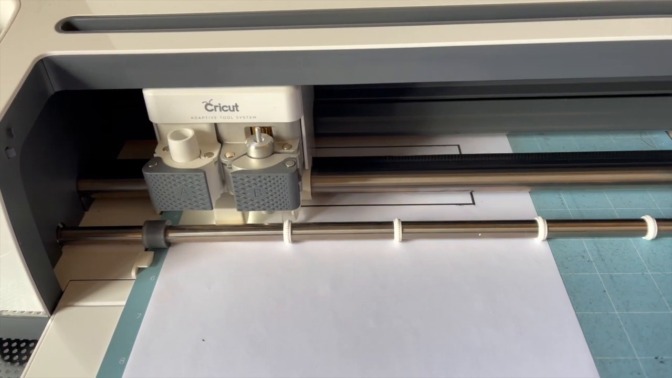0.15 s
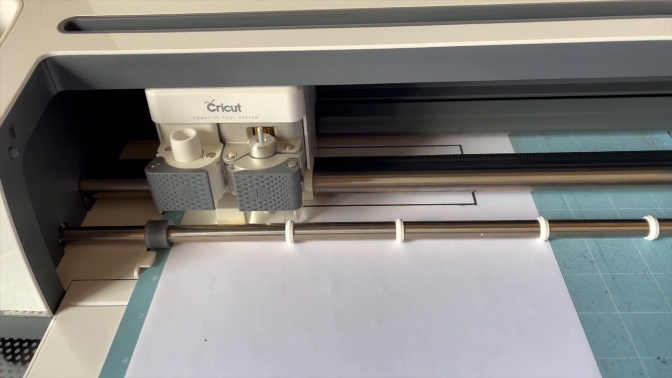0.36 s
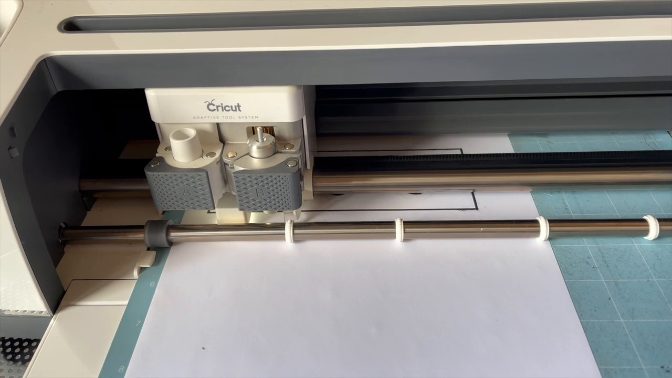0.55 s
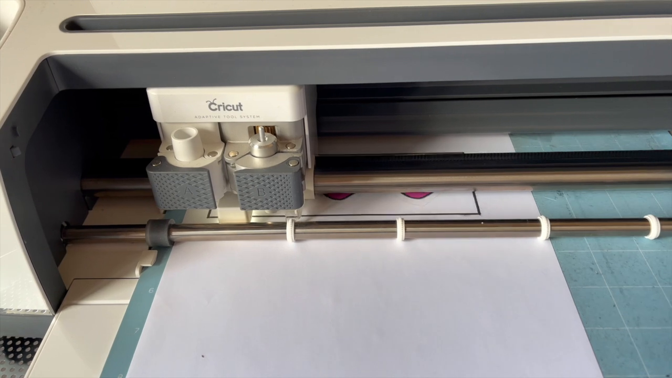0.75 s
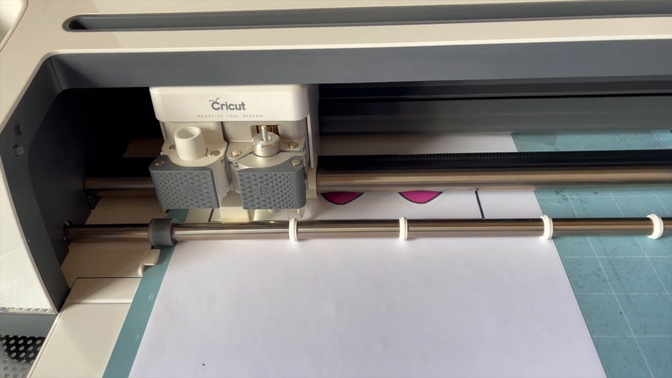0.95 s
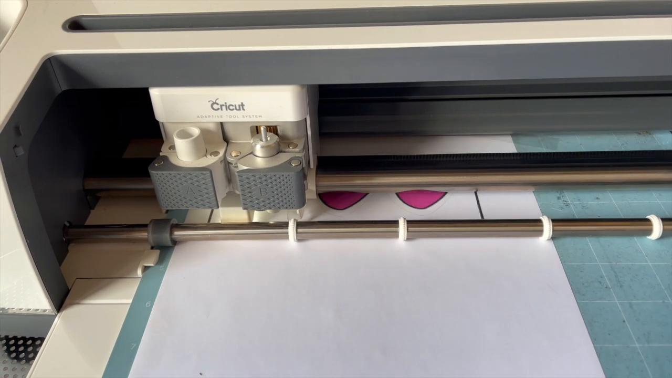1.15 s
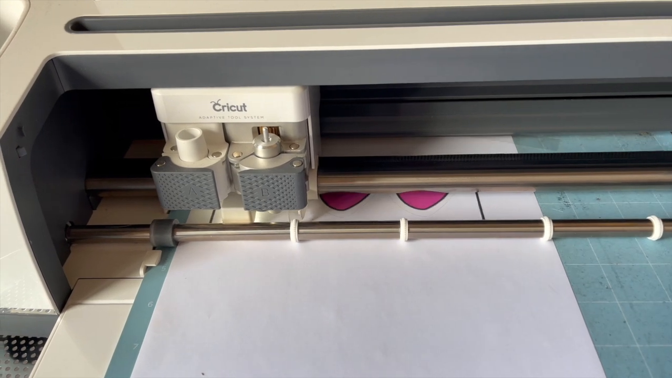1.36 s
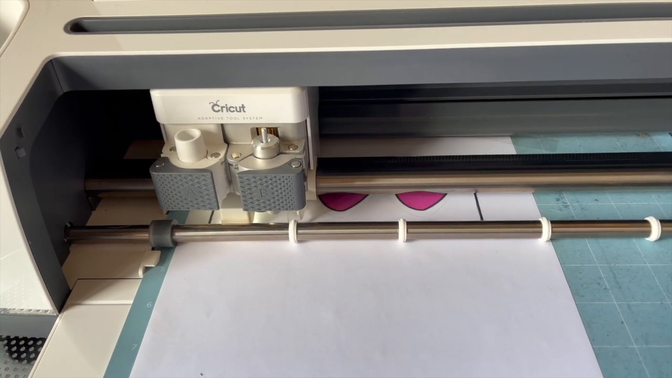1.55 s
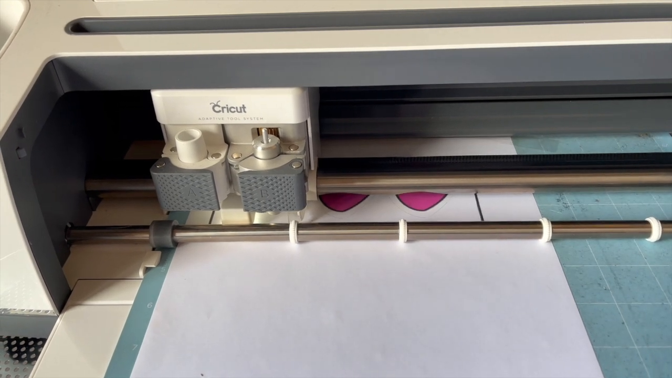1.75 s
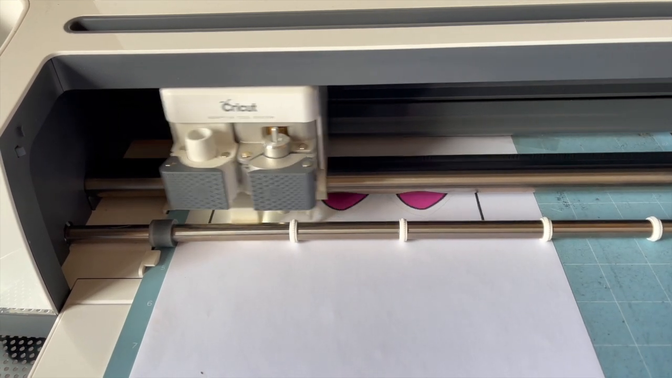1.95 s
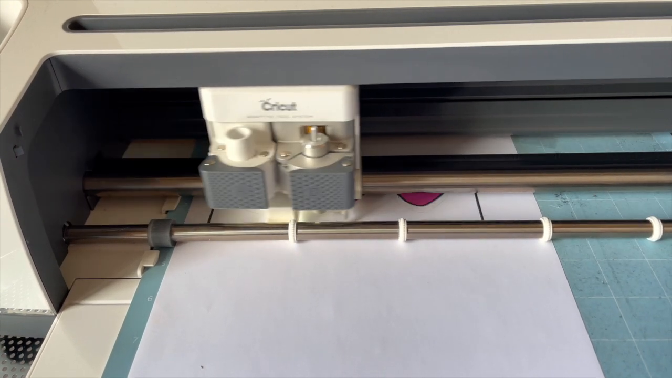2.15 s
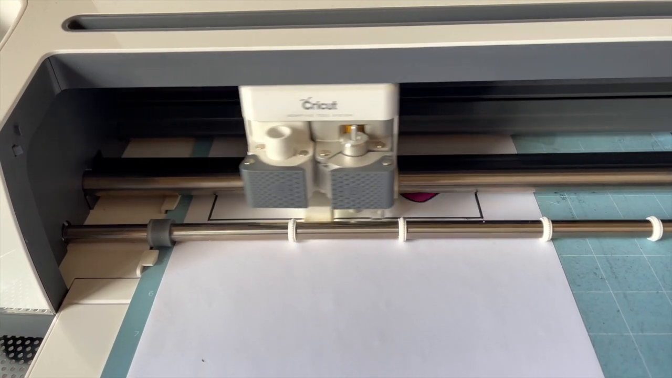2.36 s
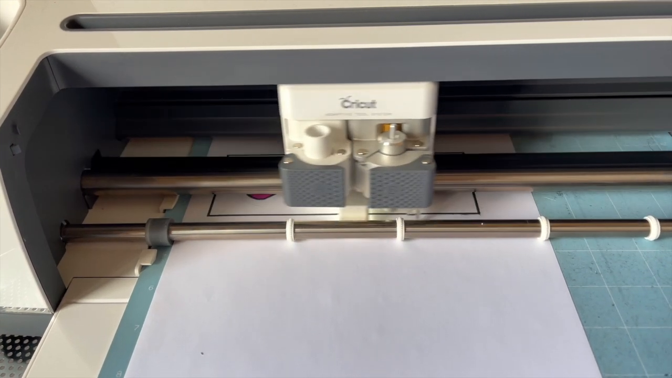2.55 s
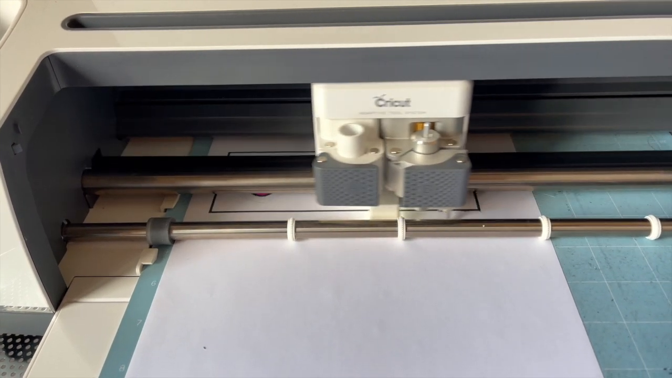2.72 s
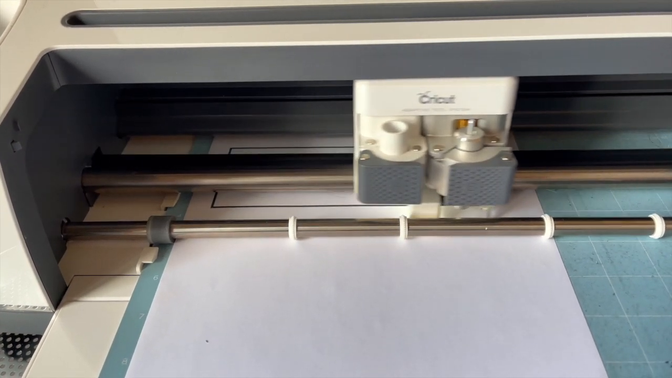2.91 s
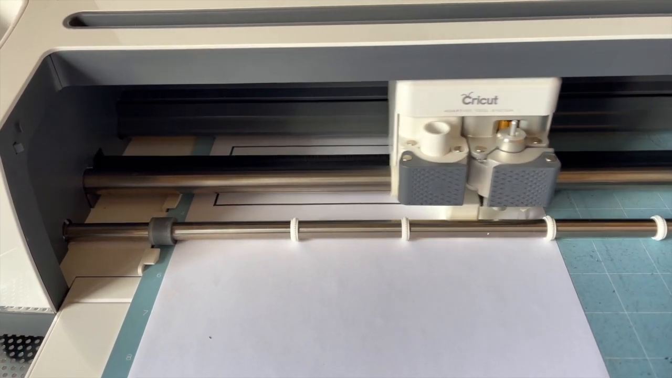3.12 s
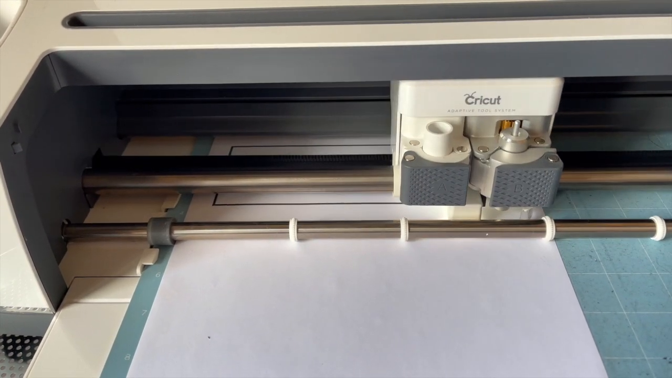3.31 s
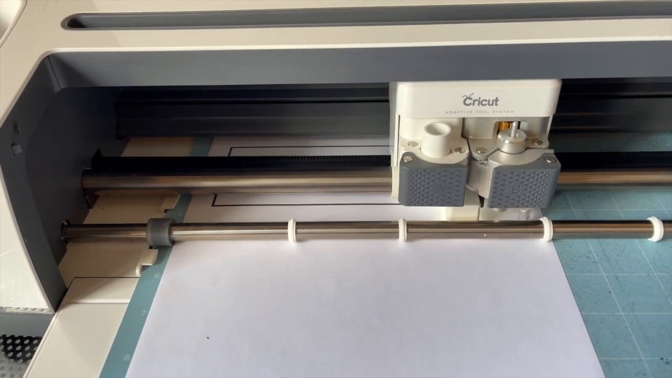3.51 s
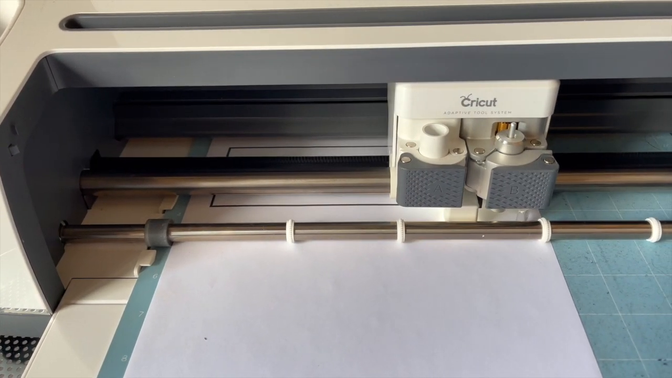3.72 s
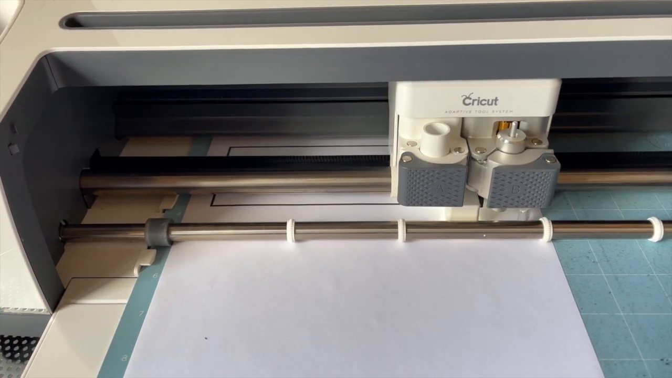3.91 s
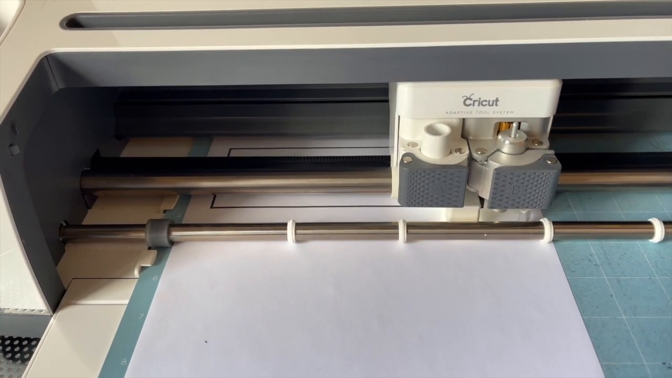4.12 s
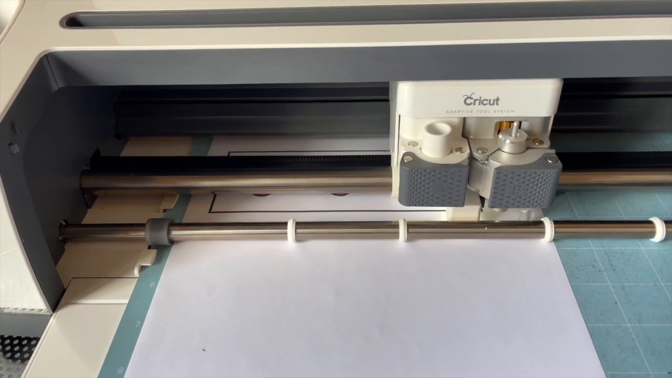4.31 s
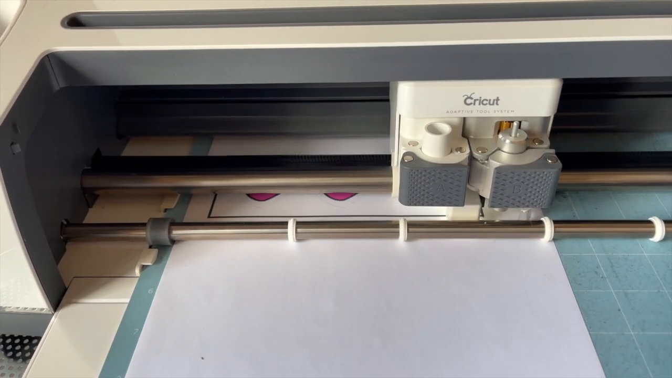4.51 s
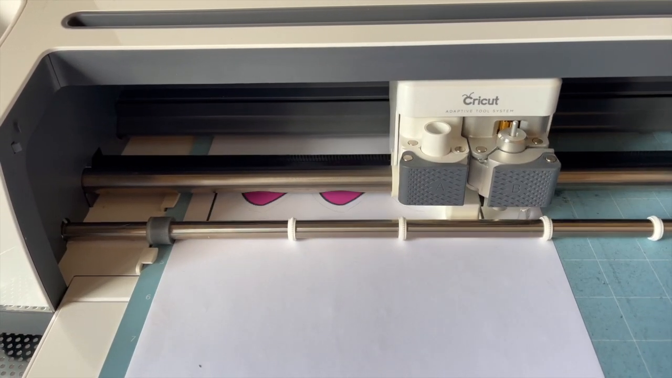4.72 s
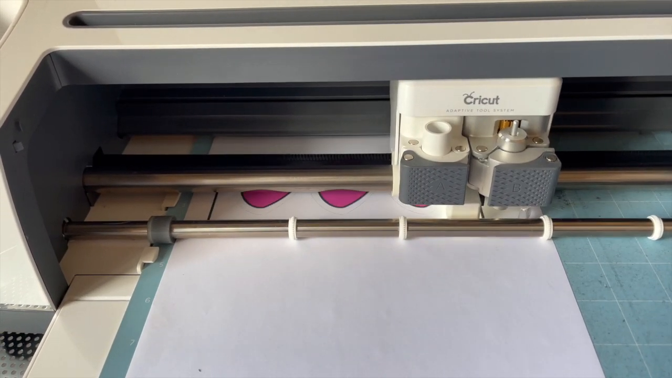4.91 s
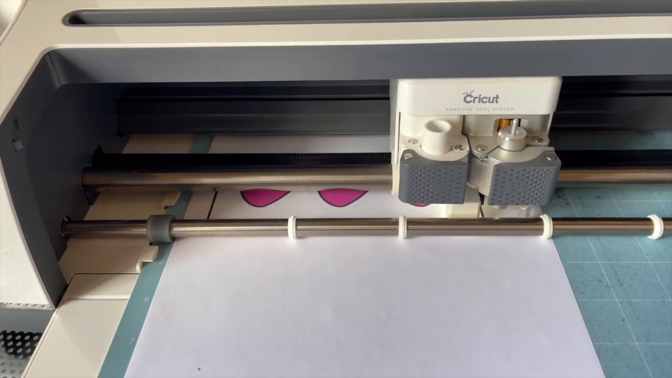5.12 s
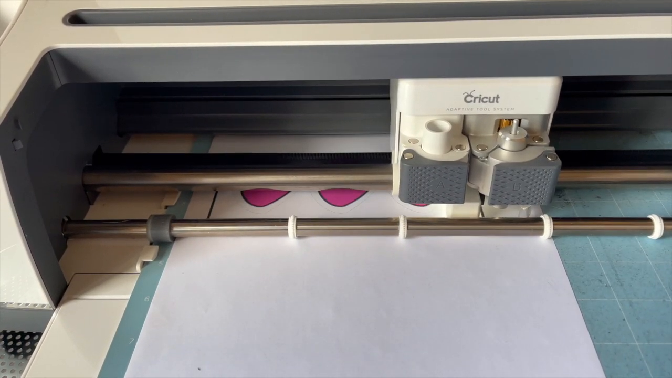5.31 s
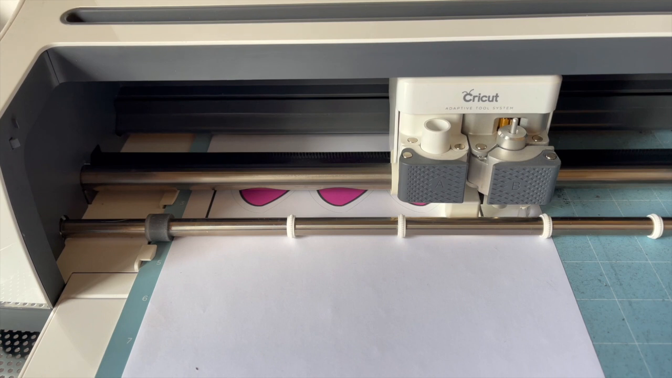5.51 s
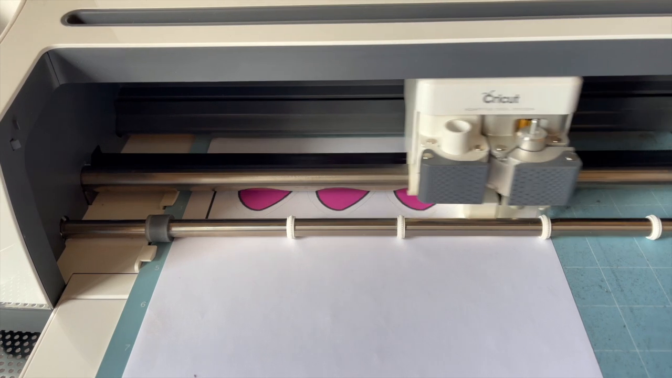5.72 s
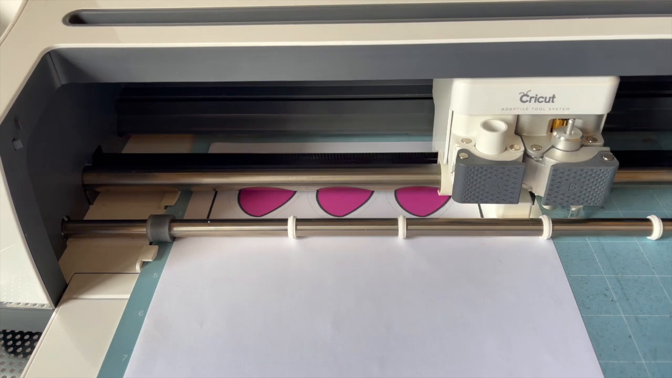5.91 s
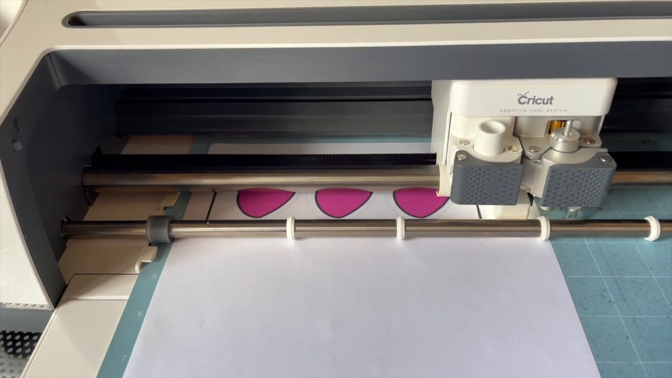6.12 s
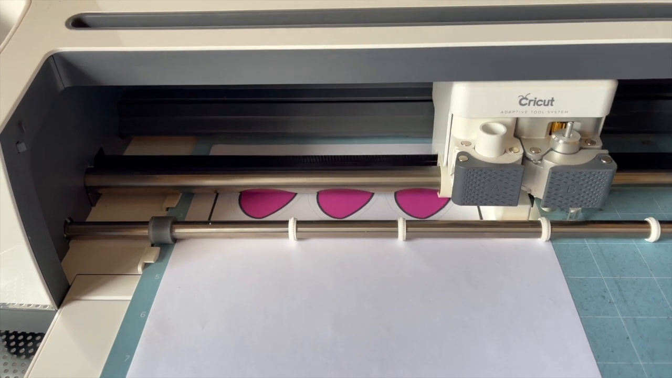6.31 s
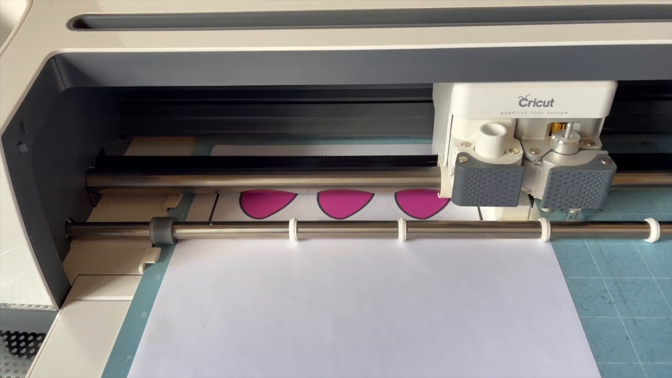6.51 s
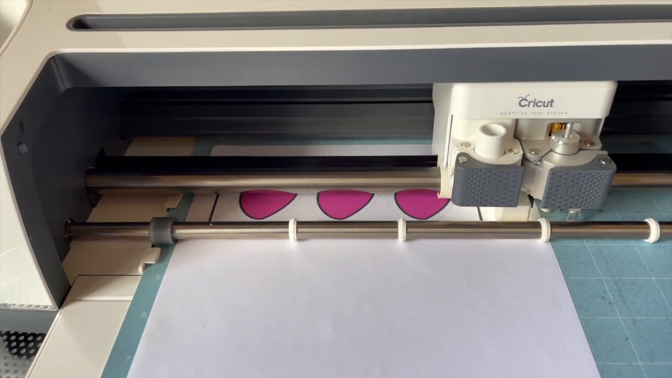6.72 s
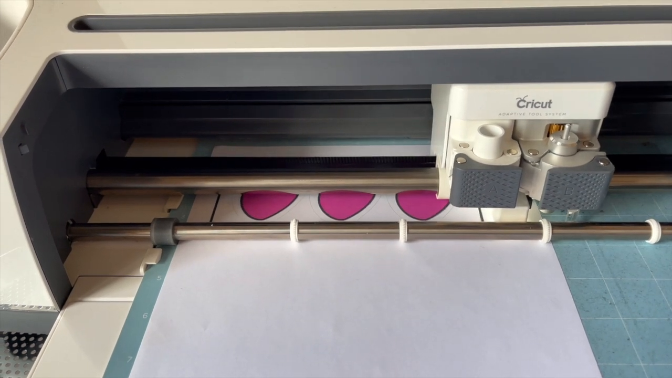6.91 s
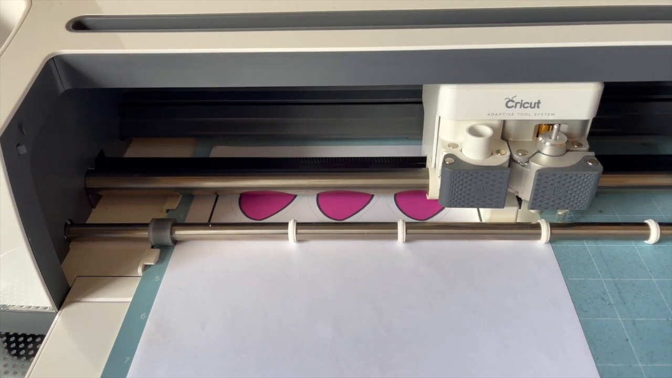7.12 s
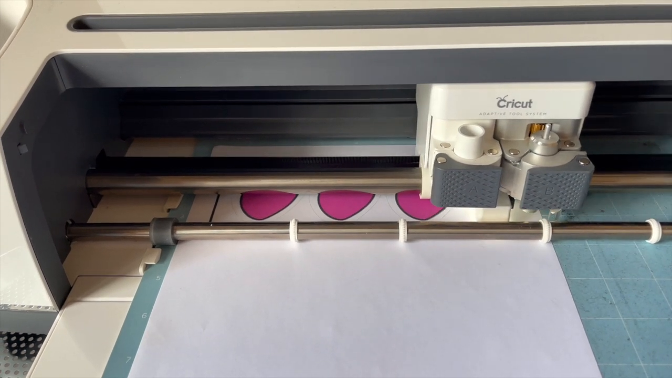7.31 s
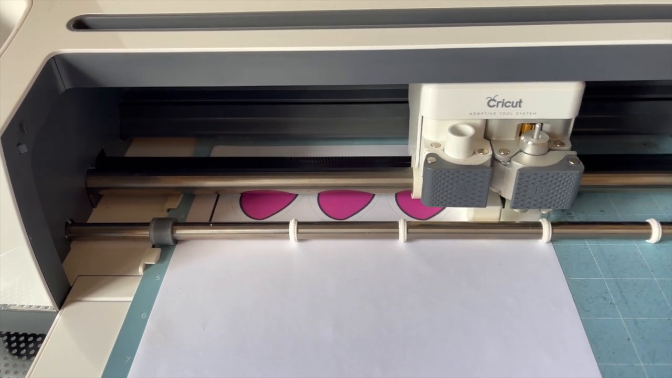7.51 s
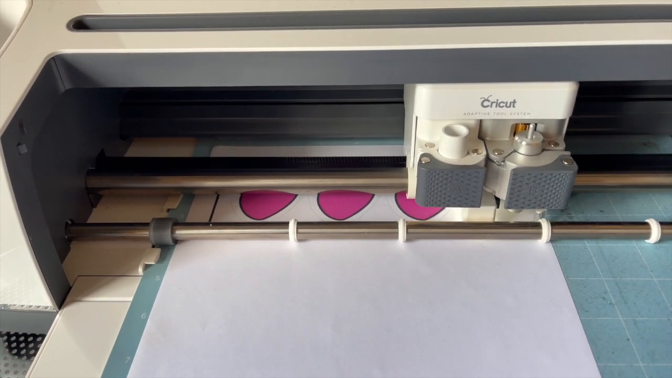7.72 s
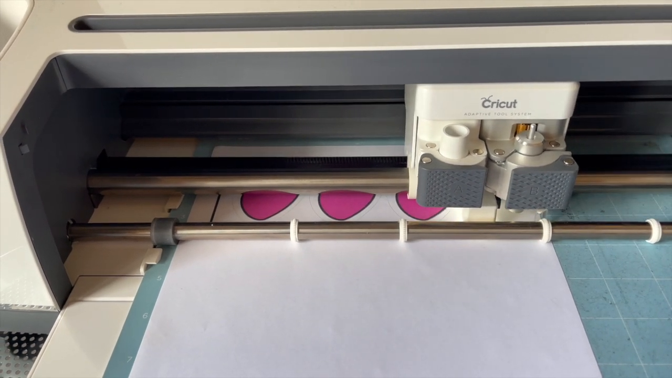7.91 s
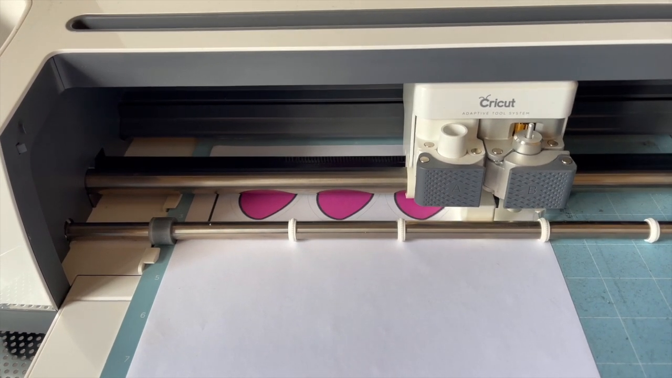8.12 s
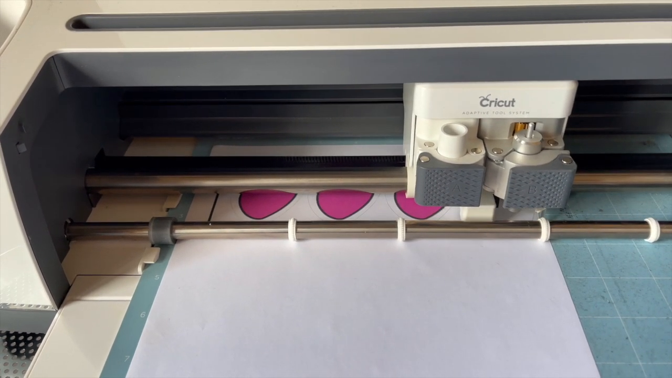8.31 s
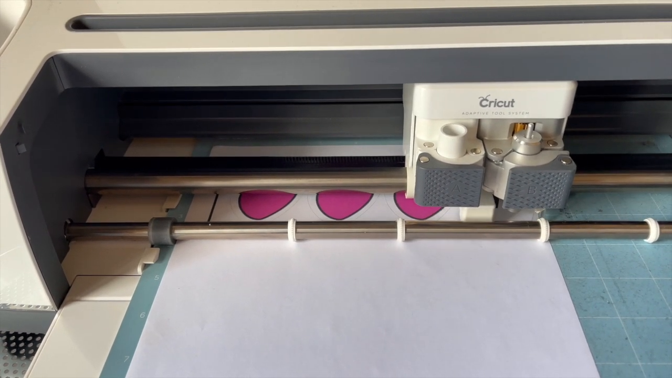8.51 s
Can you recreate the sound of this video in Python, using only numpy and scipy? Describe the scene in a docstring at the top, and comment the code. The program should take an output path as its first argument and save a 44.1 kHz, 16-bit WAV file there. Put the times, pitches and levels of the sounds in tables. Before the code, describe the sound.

Small geared motors buzz through a thin plastic housing, recorded very close in stereo. Rough, toothy feed grinding alternates with faster, fizzier carriage whirring, with dull double clacks as slack gears take up. Long pauses separate the early moves; later ones are shorter and closer together, ending in a single knock. Quiet indoor air, soft hiss and low rumble lie underneath.

```python
"""Desktop craft cutter at work

Carriage and mat run in short moves close to a two-port microphone.
Geared motors grind and buzz through a plastic housing: shaft-locked noise, tooth-gated scraping, gear tones.
Gear slack knocks as noise bursts ringing the case; the motor drive whines near 15.6 kHz.
The desk hums along and a small quiet room rings briefly, over room tone, hiss and a low rumble."""
import sys
import numpy as np
from scipy import signal
from scipy.fft import rfft, irfft, next_fast_len
from scipy.io import wavfile
from scipy.ndimage import uniform_filter1d

SR = 44100
rng = np.random.default_rng(int(sys.argv[2]) if len(sys.argv) > 2 else 0)


def generate_wav(signal):
    """Clip the signal to [-1, 1] and save it as 16-bit WAV at the path in sys.argv[1]."""
    frames = np.transpose(np.atleast_2d(signal))
    scaled = np.clip(frames, -1, 1) * 32767
    pcm = np.round(scaled).astype(np.int16)
    wavfile.write(sys.argv[1], SR, pcm)


N = 377055


def amp(db):
    """Amplitude factor of a level in dB."""
    return 10 ** (np.asarray(db) / 20)


def noise(length):
    """White Gaussian noise."""
    return rng.standard_normal(length)


def evened(x):
    """Scales to rms 1."""
    return x / np.sqrt(np.mean(x ** 2) + 1e-20)


def read(points, hz):
    """Interpolates a spectrum table along log frequency."""
    f, value = np.transpose(points)
    return np.interp(np.log(hz + 1), np.log(f + 1), value)


def add(mix, start_s, sound):
    """Adds a sound into the mix at its start, cut at the mix's end."""
    part = mix[..., round(start_s * SR):][..., :sound.shape[-1]]
    part += sound[..., :part.shape[-1]]


def colour(x, points, panels=()):
    """Filters by a dB spectrum with narrow resonances on top; rms 1."""
    size = next_fast_len(len(x) + 4096)
    hz = np.fft.rfftfreq(size, 1 / SR)
    db = read(points, hz)
    for f, width_hz, lift_db in panels:
        db = db + lift_db / (1 + (2 * (hz - f) / width_hz) ** 2)
    return evened(irfft(rfft(x, size) * amp(db), size)[:len(x)])


def wander(length, hz):
    """Slow chance about zero, rms 1."""
    width = int(SR / hz)
    slow = uniform_filter1d(uniform_filter1d(noise(length), width), width)
    return evened(slow - slow.mean())


def ring(modes, t):
    """Sum of exponentially decaying sines, one a mode (Hz, dB, t60 s)."""
    f, db, t60 = np.transpose(modes)[:, :, None]
    return (amp(db - 60 * t / t60) * np.sin(2 * np.pi * f * t)).sum(0)


# Port phase step. Each row: frequency in Hz, left lead in radians.
PORTS = [(0, 0), (100, -.1), (250, -.3), (450, -.5), (900, -1), (1500, 0), (2200, .2), (3500, .6),
         (4300, 1.3), (5000, 3.1), (5500, 5.2), (5900, 6.28), (6700, 6.5), (8000, 8.2), (8800, 9.3),
         (9100, 3 * np.pi), (10100, 3 * np.pi), (11000, 10.7), (12300, 12.57), (13800, 12.57),
         (15000, 14.8)]
# Port level step. Each row: frequency in Hz, left minus right in dB.
TILT = [(60, -2.5), (350, 2.5), (1200, -3.5), (2000, 2), (2500, -0.5), (3100, -1), (3600, 2.5), (4600, -3),
        (5200, -1), (5700, 0.5), (7000, 1)]


def ports(x, other, likeness):
    """Two ports: a shared part with phase and level steps by pitch, and an unshared part of opposite sign."""
    hz = np.fft.rfftfreq(N + 1, 1 / SR)
    step = amp(read(TILT, hz) / 2) * np.exp(.5j * read(PORTS, hz))
    same = np.clip(read(likeness, hz), -1, 1)
    shared = np.sqrt((1 + same) / 2) * rfft(x, N + 1)
    apart = np.sqrt((1 - same) / 2) * rfft(other, N + 1) * np.array([[1], [-1]])
    return irfft((shared + apart) * np.array([step, 1 / step]), N + 1)[:, :N]


# Room air. Each row: frequency in Hz, left-right likeness from -1 to 1.
SAME = [(60, .95), (250, .3), (700, -.7), (1200, -.6), (1700, 0), (2100, .4), (3300, .1), (5000, .6),
        (6200, .95), (7500, .65), (8800, 1), (10200, 1), (11000, .72), (13000, 1)]
# Room tone and hiss spectrum. Each row: frequency in Hz, level in dB per Hz.
FLOOR = [(20, -19), (60, -11), (100, -8), (170, -10), (300, -13), (500, -17), (800, -21), (1300, -24),
         (2500, -29), (5200, -32), (8900, -33), (11500, -31), (12900, -42), (13900, -70)]
# Low rumble before its wobble. Each row: time in seconds, level in dB.
SWAY = [(0, -87.5), (0.7, -72), (1.2, -67), (1.6, -89), (2.1, -67), (4.4, -62.5), (5.201, -65.5),
        (7.6, -64), (8.55, -68)]


def air():
    """Room tone and microphone hiss, a low rumble that comes and goes, the last ring of an earlier move."""
    t = np.arange(N) / SR
    floor_db, wobble_db, fading_db, fall_db_per_s = -69.5, 4, -63, 190
    hiss = ports(colour(noise(N), FLOOR), colour(noise(N), FLOOR), SAME)
    low = colour(noise(N), [(20, -39.5), (35, -9), (55, -0.5), (95, -2), (160, -27), (300, -60)])
    low_db = np.interp(t, *np.transpose(SWAY)) + wobble_db * wander(N, 6)
    last = colour(noise(N), [(150, -20), (300, -0.5), (800, -10), (1600, -19.5), (3000, -50)])
    fading = amp(fading_db - fall_db_per_s * t) * last
    return fading + amp(floor_db) * hiss + amp(low_db) * low


# Room decay. Each row: frequency in Hz, t60 in seconds.
ROOM = [(100, .55), (260, .38), (700, .28), (1800, .3), (2600, .26), (4000, .15), (6000, .1), (12000, .07)]
# Room tail colour: a dip near 3 kHz, brighter above. Each row: frequency in Hz, tail level in dB.
TAIL_COLOUR = [(2500, -5), (3100, -8), (8000, 3)]


def room(x):
    """Sparse taps of random sign, each band dying at its own speed."""
    taps, slots = np.zeros(SR // 2), np.arange(300, SR // 2 - 20, 20)
    taps[slots + rng.integers(0, 20, len(slots))] = rng.choice([-1., 1.], len(slots))
    hz, t, z = signal.stft(taps, SR, nperseg=512)
    decay_db = read(TAIL_COLOUR, hz)[:, None] - 60 * t / read(ROOM, hz)[:, None]
    tail = signal.istft(z * amp(decay_db), SR, nperseg=512)[1]
    return signal.fftconvolve(x, tail / np.linalg.norm(tail))[:N]


def scattered(x):
    """The same sound after bouncing among nearby parts for some milliseconds."""
    burst = rfft(noise(4096) * np.exp(-np.arange(4096) / 500))
    power = uniform_filter1d(abs(burst) ** 2, 30)
    return signal.oaconvolve(x, irfft(burst / np.sqrt(power)))[:N]


# Desk modes. Each row: frequency in Hz, relative level in dB, t60 in seconds.
DESK = [(126, -16, .4), (158, -14, .4), (235, -19, .4), (300, -16, .45), (345, -17, .4), (410, -19, .4)]


def desk(machine):
    """The machine's sound excites desk modes that hum on after each stop."""
    response = amp(-48.5) * ring(DESK, np.arange(SR // 2) / SR)
    return signal.fftconvolve(machine, response)[:N]


# Case modes, softened and shortened in use. Each row: frequency in Hz, raw level in dB, raw t60 in seconds.
CASE = [(468, -21.5, 0.027), (800.6, -35, 0.061), (1079.5, -15.5, 0.08), (1246, 4, 0.01),
        (1360, -3, 0.0092), (1815, 5.5, 0.043), (2233, 3, 0.064), (3050, -40, 0.39), (2950, -32, 0.21),
        (3420, -40.5, 0.053), (3600, -31, 0.031), (4110, -44, 0.059), (4370, -32.5, 0.065),
        (4700, -41.5, 0.063)]
# Case rumble spectrum. Each row: frequency in Hz, level in dB per Hz.
RUMBLE = [(130, -39.5), (215, -5.5), (290, 0), (360, -1), (394, -3.5), (426, -2), (565, -7.5), (600, -12),
          (780, -34), (1320, -120)]
# Carriage motor fizz spectrum, also the knock's tick. Each row: frequency in Hz, level in dB per Hz.
FIZZ = [(2000, -48), (2800, -3.5), (3100, -13.5), (3500, 1), (4100, -17.5), (5100, -2.5), (5700, -11.5),
        (6500, -15.5), (7600, -14), (8400, -12.5), (10300, -8), (11500, -8), (12800, -19.5), (13300, -28),
        (13800, -70.5)]


def knock(s, db, hz, upper_db, tick_db, thump_db):
    """A short swelling rattle rings the case, most near its brightest pitch; the desk thumps."""
    t = np.arange(SR // 5) / SR
    rattle = noise(len(t)) * (t / .004) ** 3 * np.exp(-t / .0025)
    lower = [(f, .5 * g - 9 * np.log2(f / hz) ** 2, np.clip(.3 * d, .008, .03))
             for f, g, d in CASE if f < 1600]
    upper = [(f, .6 * g, np.clip(.4 * d, .008, .025)) for f, g, d in CASE if f >= 1600]
    parts = [signal.fftconvolve(rattle, ring(modes, t))[:len(t)] for modes in (lower, upper)]
    parts.append(colour(rattle, FIZZ))
    click = sum(amp(g) * p / abs(p).max() for g, p in zip((db, upper_db, tick_db), parts))
    click = signal.lfilter(*signal.butter(3, 620, "high", fs=SR), click)  # the click keeps no bass
    bass = [(70, -24.5), (130, 0)] + RUMBLE[1:4] + [(500, -6.5), (900, -30.5), (1500, -80.5)]
    thump = amp(thump_db - 60 * t / 0.22) * np.minimum(t / .025, 1) * colour(noise(len(t)), bass)
    return s - .007, click + thump  # the rattle swells for about 7 ms


# Gear slack taking up. Each row: time of swell in seconds, lower ring peak in dB before the bass cut,
# brightest pitch in Hz, upper ring peak in dB, tick peak in dB, bass thump in dB.
KNOCKS = [(0.321, -19.5, 1146, -21.5, -54, -49.5), (0.358, -14.5, 1192, -22.5, -36, -49),
          (1.831, -23.5, 1145, -21.5, -59, -48), (1.863, -20.5, 970, -34.5, -42, -52),
          (3.219, -22.5, 1299, -29.5, -56, -45.5), (3.472, -45, 1097, -46, -55, -45.5),
          (3.519, -15.5, 1040, -20.5, -54.5, -54), (3.589, -17, 1068, -20.5, -43, -48.5),
          (4.021, -29, 1290, -38, -58, -51), (4.846, -30, 1260, -36, -50, -47.5),
          (5.543, -21.5, 1145, -24, -59.5, -54), (5.591, -15, 1110, -22.5, -36, -55),
          (5.988, -18.5, 1054, -21, -54, -41), (6.252, -40, 833, -46, -53.5, -47.5),
          (6.293, -23.5, 1460, -26.5, -41, -55), (6.374, -20, 1194, -33, -40, -53.5),
          (6.82, -33, 1374, -44, -43, -41), (6.836, -38, 1300, -41, -39.5, -61),
          (7.049, -20, 1140, -34, -70.5, -50), (7.39, -36, 1300, -31.5, -47, -60.5),
          (7.675, -25.5, 1280, -41.5, -49.5, -38.5), (8.263, -14, 1150, -22, -66, -31.5)]


def knocks(machine):
    """Gear slack knocks through the case, one a row."""
    for row in KNOCKS:
        add(machine, *knock(*row))


def gear_tones(tones, shaft_hz, turns, speed):
    """Gear tones turn with the shaft, waver a little and sound near cruising speed."""
    out = np.zeros(len(turns))
    cruising = np.clip(speed * 12 - 11, 0, 1) * np.sqrt(2)
    for hz, db in tones:
        order = hz / shaft_hz
        if abs(order - round(order)) < .25:
            order = round(order)  # most are whole shaft orders
        waver = amp(db - .5 + 1.5 * wander(len(turns), 8))
        out += cruising * waver * np.cos(2 * np.pi * (order * turns + rng.random()))
    return out


def drive_whine(t, turns):
    """Chopper whine, with a side tone below it from the commutator segments."""
    whine_hz, segments = 15625, 5
    carrier = whine_hz * t
    return 1.6 * np.cos(2 * np.pi * carrier) + .6 * np.cos(2 * np.pi * (carrier - segments * turns))


# Housing panels. Each row: frequency in Hz, width in Hz, lift in dB.
PANELS = [(327, 40, 3.5), (987, 27, 2.5), (1132, 56, 4.5), (1262, 21, 5.5), (1440, 36, 5), (1740, 46, 5.5),
          (2050, 110, 5.5), (2316, 50, 3), (2920, 51, 9.5), (3580, 37, 4.5), (5650, 72, 2.5)]
# Desk boom spectrum. Each row: frequency in Hz, level in dB per Hz.
BOOM = [(50, -47.5), (85, -17), (110, -9.5), (130, -1), (158, -1.5), (190, -11), (240, -28.5), (400, -67.5)]
# Roller feed fizz spectrum. Each row: frequency in Hz, level in dB per Hz.
FEED_FIZZ = [(2000, -51), (2800, -8), (3600, 0), (4200, -4), (5500, -4.5), (6200, -14), (7800, -5.5),
             (8400, -1.5), (9500, -9), (10300, -9), (12500, -15), (13200, -26), (13800, -74)]


def move(row, drive):
    """Worn gears repeat one rough pattern every shaft turn, under scraping that each tooth gates."""
    housing, hiss, tones, shaft_hz, repeat = drive
    start, up, down, late, stop, grind_db, fizz_db, boom_db, *ends_db = row
    rise_s, fall_s, shake_s, linger_s = .07, .1, .04, .02  # case and desk outlast the gears
    t = np.arange(start, stop + linger_s, 1 / SR)

    # levels: at crawl every move grinds alike
    crawl_grind_db, crawl_fizz_db, crawl_rumble_db, crawl_whine_db = -42, -51.5, -2, -9.5  # last two relative
    late_db, late_s = -41.5, .035  # the desk boom settles to a common late level
    full = np.interp(t, [up - rise_s, up, down, down + fall_s], [0, 1, 1, 0])
    running = np.clip((stop - t) / 0.013, 0, 1)
    shaking = np.clip((t - start) / shake_s, 0, 1)
    grind_level = running * amp(crawl_grind_db + (grind_db - crawl_grind_db) * full)
    fizz_level = running * amp(crawl_fizz_db + (fizz_db - crawl_fizz_db) * full)
    boom_level = shaking * amp(np.interp(t, [late, late + late_s], [boom_db, late_db]))
    rumble_db = np.interp(t, [start, stop], ends_db[:2]) + crawl_rumble_db * (1 - full)
    rumble_level = shaking * amp(rumble_db)
    whine_db = np.interp(t, [up, stop], ends_db[2:]) + crawl_whine_db * (1 - full)
    whine_level = running * amp(whine_db)

    # shaft: ramps up, cruises, slows
    speed = np.interp(t, [start, up, down, stop + .03], [.5, 1, 1, .4])
    turns = np.cumsum(shaft_hz * speed * (1 + .0008 * wander(len(t), 9))) / SR

    # gear contact
    teeth = 11
    wear = noise(int(SR / shaft_hz))
    pattern = wear[(turns % 1 * len(wear)).astype(int)]
    gate = 0.22 + np.exp(-(teeth * turns % 1) / 0.46)
    chatter = amp(1.2 * wander(len(t), 120) + .6 * wander(len(t), 25))  # uneven contact
    swell_db = 2.2 if hiss == FEED_FIZZ and tones else 1.2
    chatter = chatter * amp(swell_db * np.cos(2 * np.pi * turns))  # off-centre pinion, once a turn
    repeat = np.clip(repeat, 0, 1)
    scraping = evened(gate * chatter * noise(len(t)))
    scrape = np.sqrt(repeat) * pattern + np.sqrt(1 - repeat) * scraping

    out = grind_level * colour(scrape, housing, PANELS)
    out += rumble_level * colour(noise(len(t)), RUMBLE, PANELS)
    out += boom_level * colour(noise(len(t)), BOOM)
    belt = 1 + (hiss == FIZZ) * 1.5 * np.exp(-((turns / 3 - .14) % 1) / .06)  # pulley tick every third turn
    out += fizz_level * colour(belt * np.sqrt(gate) * chatter * noise(len(t)), hiss, PANELS)
    out += gear_tones(tones, shaft_hz, turns, speed)
    out += whine_level * drive_whine(t, turns)
    return start, out * np.clip((t - start) / 0.02, 0, 1) * np.clip((t[-1] - t) / 0.0091, 0, 1)


# Grind through the housing, by way of driving. Each row: frequency in Hz, level in dB per Hz.
FEED_IN = [(320, -38.5), (550, -15), (744, -17.5), (801, -11.5), (875, -13), (1010, 0.5), (1060, -7),
           (1140, -4.5), (1250, -9), (1350, -5), (1410, -19), (1620, -9), (1750, -23.5), (2330, -13.5),
           (3200, -39.5), (4160, -72.5), (7040, -120)]
FEED_OUT = [(320, -33), (550, -6), (592, -20), (744, -15), (825, -10.5), (868, -16), (1130, -4.5),
            (1380, -15.5), (1510, -16.5), (1600, -23), (1760, -15.5), (2100, -27.5), (2350, -19),
            (2720, -32), (3200, -57), (4160, -64), (7040, -120)]
TRAVERSE = [(320, -51.5), (550, -20), (614, -13), (801, -5.5), (868, -11.5), (1160, -3.5), (1260, -2.5),
            (1410, 0), (1530, -6.5), (1800, -5.5), (1900, -2.5), (2070, -4.5), (2530, -19), (2890, -29.5),
            (3200, -18.5), (4160, -60), (7040, -120)]
DIAGONAL = [(320, -62.5), (550, -12.5), (650, -29.5), (726, -15), (812, -16), (927, -12.5), (1100, -10),
            (1190, -7), (1290, -11.5), (1640, -18.5), (1810, -13), (2900, -35), (3770, -70.5), (6380, -120)]
HOP = [(320, -35), (550, -11.5), (813, -12.5), (856, -14), (1130, -6), (1390, -14.5), (1510, -7),
       (1640, -16), (1810, -4.5), (2130, -13), (2350, -7.5), (2680, -21), (3200, -28), (4160, -43),
       (7040, -120)]
CREEP = [(320, -41), (550, -31), (628, -4.5), (783, -4), (856, -6), (984, -12), (1260, -4.5), (1590, -15),
         (1760, -9.5), (1920, -20.5), (2330, -13.5), (2680, -21.5), (3200, -31), (4160, -42), (7040, -120)]
# Strongest tones at cruise, mostly gear tones snapped to shaft orders; the feed-out one at 1136 Hz is a narrow
# resonance. Each row: frequency in Hz, level in dB rms.
FEED_IN_TONES = [(328.4, -50), (495.3, -62), (656.8, -61), (823.6, -48), (990.5, -45), (1141, -49),
                 (1168, -51), (1319, -46), (1486, -57), (1588, -56)]
FEED_OUT_TONES = [(129.2, -49), (328.4, -40), (463.0, -52), (656.8, -56), (823.6, -52), (1001, -52),
                  (1136, -44), (1314, -52), (1480, -54), (1750, -55)]
TRAVERSE_TONES = [(285.3, -39), (393.0, -46), (522.2, -54), (576.0, -49), (678.3, -56), (807.5, -52),
                  (990.5, -49), (1044, -50), (1071, -51), (1098, -48), (1120, -47), (1147, -39),
                  (1174, -42), (1200, -41), (1357, -42), (1384, -42), (1410, -41), (1437, -39), (1486, -51),
                  (1620, -44), (1696, -46), (1750, -39), (1776, -40), (1906, -46), (2008, -43), (2062, -47),
                  (2218, -51), (2272, -55)]
DIAGONAL_TONES = [(285.3, -39), (473.7, -42), (710.6, -42), (952.8, -37), (1044, -43), (1190, -32),
                  (1437, -41), (1771, -42), (2008, -47), (2035, -44)]
# How each move is driven. Each row: grind colour, fizz colour, tones, shaft turns per second at cruise,
# share of the grind repeating every turn from 0 to 1.
DRIVES = [(FEED_IN, FEED_FIZZ, FEED_IN_TONES, 14.98, .3), (TRAVERSE, FIZZ, TRAVERSE_TONES, 26.09, .38),
          (CREEP, FIZZ, [], 8, .1), (FEED_OUT, FEED_FIZZ, FEED_OUT_TONES, 14.93, .3),
          (DIAGONAL, FIZZ, DIAGONAL_TONES, 21.6, .15), (CREEP, FEED_FIZZ, [], 8, .1), (CREEP, FEED_FIZZ, [],
          8, .1), (HOP, FEED_FIZZ, [], 21.4, .2)]
# Moves. Each row: start, cruise start, cruise end, time the desk boom turns to its late level and stop
# in seconds, then in dB: gear grind, brush fizz and desk boom, case rumble at start and at stop,
# drive whine at cruise start and at stop.
MOVES = [(0.315, 0.40, 1.15, 1.06, 1.195, -37, -56.5, -59, -55, -39, -76, -59),
         (1.824, 1.95, 3.07, 3.01, 3.272, -30.5, -40.5, -43, -42, -37, -56, -62),
         (3.468, 3.54, 3.60, 3.48, 3.65, -39, -51, -42, -37, -39, -76, -76),
         (4.012, 4.08, 4.84, 4.85, 4.893, -34.5, -55, -47, -40, -38, -65, -70),
         (5.533, 5.67, 5.82, 5.94, 6.025, -27, -40.5, -45, -37, -36, -60, -80),
         (6.249, 6.30, 6.39, 6.35, 6.425, -39, -51, -37, -40, -36, -82, -86),
         (6.812, 6.84, 7.65, 6.98, 7.685, -43, -59, -37, -39, -39, -70, -79),
         (7.035, 7.05, 7.24, 7.27, 7.275, -28, -45, -50, -42, -40, -88, -88)]


def moves(machine):
    """Carriage and feed motors run, one move a row."""
    for row, drive in zip(MOVES, DRIVES):
        add(machine, *move(row, drive))


# Machine at the ports. Each row: frequency in Hz, left-right likeness from -1 to 1.
NEAR = [(100, .99), (400, .96), (900, .88), (1900, .97), (2500, .4), (3300, .3), (4300, .5), (4800, .8),
        (6200, 1), (7300, .75), (8700, 1), (10200, 1), (10700, .85), (12000, .85), (13000, 1)]


def scene():
    """Machine, desk and room reach the two ports over the room air."""
    machine = np.zeros(N)
    moves(machine)
    knocks(machine)
    heard = machine + desk(machine) + amp(-12) * room(machine)
    heard = signal.lfilter(*signal.butter(2, 75, "high", fs=SR), heard)  # the deep bass falls away below 75 Hz
    return ports(heard, scattered(heard), NEAR) + air()


def record(dry):
    """The band limit: a steep linear-phase low-pass."""
    edge_hz = 15900
    lowpass = signal.firwin(511, edge_hz, window=("kaiser", 9), fs=SR)
    return signal.oaconvolve(dry, lowpass[None], "same")


dry = scene()
out = record(dry)
generate_wav(out)
```